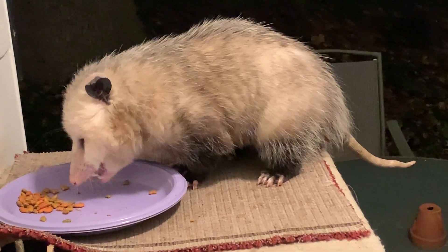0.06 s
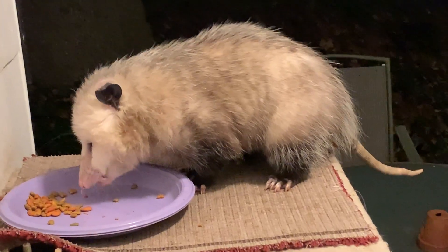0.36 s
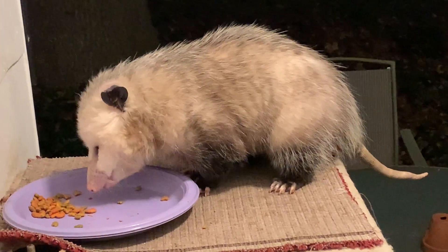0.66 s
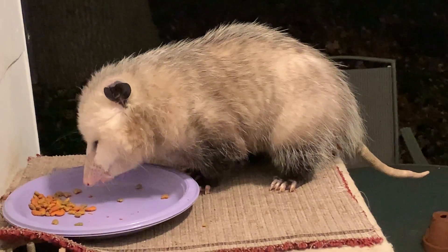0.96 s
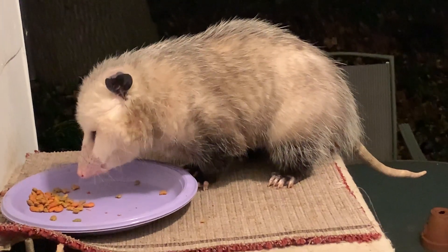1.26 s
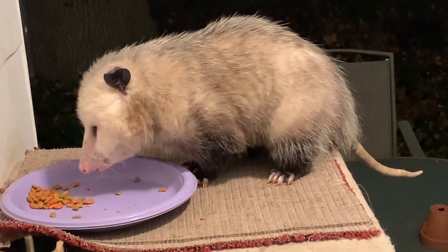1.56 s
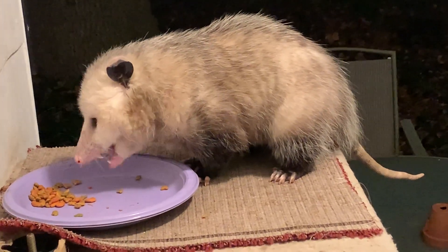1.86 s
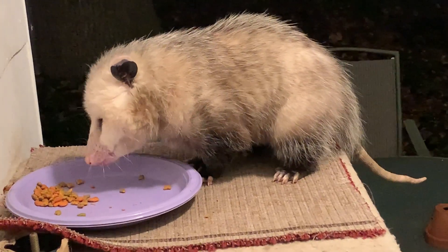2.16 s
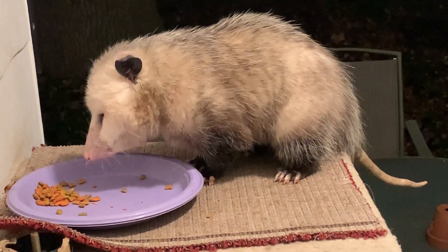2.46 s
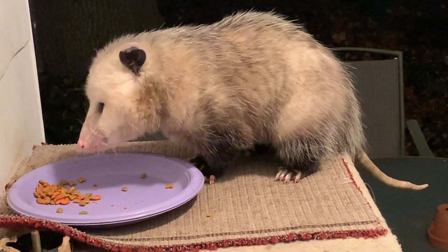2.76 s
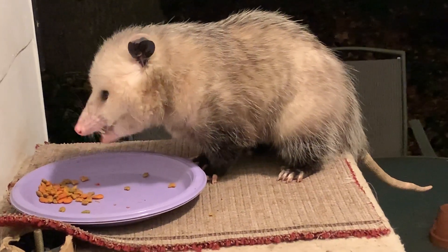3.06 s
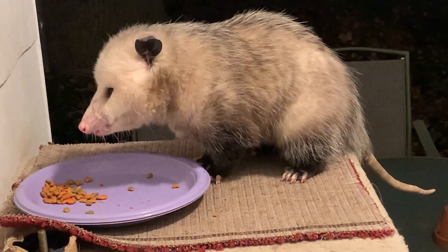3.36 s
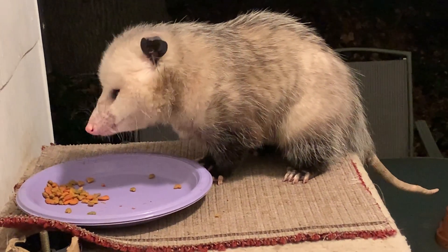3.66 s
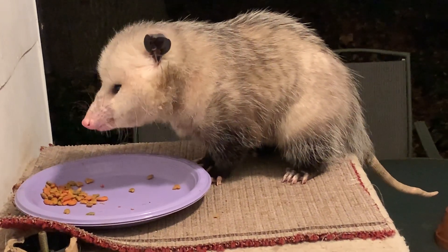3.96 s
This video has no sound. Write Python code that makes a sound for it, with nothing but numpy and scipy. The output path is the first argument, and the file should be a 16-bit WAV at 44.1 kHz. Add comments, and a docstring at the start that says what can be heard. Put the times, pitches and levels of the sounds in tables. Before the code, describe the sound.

A small animal crunches dry pet food on a porch at night, heard up close. Sharp, uneven cracks alternate with softer grinding and wet clicks throughout, over a steady low outdoor rumble and faint hiss.

```python
"""Opossum chewing kibble

An opossum chews dry kibble over a plate on a porch at night, about three bites a second.
Each piece breaks with a bright crack that rings the mouth and knocks the jaw; crumbs grind between
bites. The table and a wall close by throw the sound back, over a low outdoor rumble and faint hiss."""
import sys
import numpy as np
from scipy import signal
from scipy.fft import rfft, irfft
from scipy.io import wavfile

SR = 44100
rng = np.random.default_rng(int(sys.argv[2]) if len(sys.argv) > 2 else 0)


def unload_wav(signal):
    """Save mono or channel-first audio to the path in sys.argv[1] as 16-bit WAV at rate SR, clipped to [-1, 1]."""
    wavfile.write(
        sys.argv[1],
        SR,
        np.round(np.clip(np.atleast_2d(signal).T, -1, 1) * 32767).astype(np.int16),
    )


N = 176400

# tone of the night's rumble and hiss (f/Hz, level/dB)
RUMBLE_TONE = [(22, -71), (31, -21), (41, -5.5), (58, 0), (80, -4.5), (120, -9), (190, -16), (270, -20.5),
               (380, -32.5), (520, -51.5), (1000, -54)]
HISS_TONE = [(300, 8), (700, 9.5), (1200, 4.5), (1700, -2.5), (2700, -1), (3300, -2.5), (4000, 2.5),
             (4400, 0.5), (4750, 11), (5050, 3), (5600, 1.5), (6250, 3), (7800, -1.5), (8300, -2),
             (8700, -1.5), (9600, -6.5), (10250, -1), (10700, -13), (13000, -20), (15600, -47.5)]
# how much louder the hiss is on the left (f/Hz, level/dB)
HISS_TILT = [(200, -3.5), (1500, 3), (2700, 1), (3500, 0), (5000, -3.5), (6200, -7), (7500, -4.5),
             (8400, 3.5)]
# how alike the night sounds on both sides (f/Hz, likeness from 0 to 1)
LIKENESS = [(60, 1), (200, 0.99), (350, 0.55), (550, 0.12), (1200, 0.033), (3000, 0.1), (6000, 0.12)]
# crumbs grinding (t/s, length/s, mouth f/Hz, ring level/dB, crack level/dB)
GRINDS = [(0.097, 0.062, 1570, -68, -83), (0.384, 0.021, 1065, -64, -84), (0.44, 0.025, 1840, -56.5, -69),
          (0.554, 0.048, 1720, -56, -73), (0.63, 0.029, 1430, -51, -82), (0.696, .09, 1650, -67.5, -88),
          (0.803, 0.016, 1770, -56.5, -67), (1.135, 0.05, 1674, -75, -73),
          (1.495, 0.065, 1790, -63.5, -64.5), (1.907, 0.056, 1574, -58, -71),
          (2.309, 0.065, 1390, -73, -80), (2.402, 0.047, 1390, -58.5, -65), (2.751, 0.09, 1250, -79, -69),
          (2.908, .025, 2970, -70, -70), (3.10, 0.059, 1365, -64.5, -69), (3.41, .04, 2260, -75, -77),
          (3.482, 0.033, 1942, -59.5, -72), (3.555, 0.085, 1460, -58.5, -71),
          (3.906, 0.044, 1900, -66, -67.5), (3.969, 0.016, 3200, -60, -73)]
# kibble breaking (t/s, mouth f/Hz, ring level/dB, crack level/dB, knock level/dB)
SNAPS = [(0.1008, 1700, -42.5, -59, -68), (0.108, 1600, -44, -62, -65), (0.1269, 1570, -35, -40.5, -53.5),
         (0.1395, 1110, -41, -51, -59), (0.1893, 1110, -44.5, -73, -75), (0.2148, 1040, -26.5, -34.5, -44),
         (.5670, 1680, -35.5, -32.5, -41.5), (.5903, 1620, -29, -38.5, -40),
         (0.6359, 1380, -35.5, -40.5, -43.5), (0.6436, 1354, -39, -42, -47), (0.8115, 1820, -62, -72, -73),
         (.8622, 1500, -38.5, -57, -77), (0.9427, 1355, -23.5, -39, -37), (0.949, 1500, -56, -44, -46),
         (1.2327, 1310, -46.5, -70, -60), (1.2736, 1235, -23, -33.5, -36.5), (1.444, 1060, -49.5, -61, -57),
         (1.5, 1830, -65, -48, -76), (1.513, 1800, -47.5, -62, -76), (1.5661, 1640, -48, -38, -79),
         (1.5722, 1370, -34, -62, -63), (1.6312, 1070, -32.5, -39, -42), (1.6653, 880, -43, -62, -50),
         (1.9130, 1720, -47, -37.5, -74), (1.9295, 1593, -63, -43, -75), (1.9426, 1660, -48, -37, -64),
         (1.9728, 1510, -46, -44, -64), (2.007, 1540, -44.5, -45, -51), (2.0639, 1620, -39.5, -38.5, -48),
         (2.0930, 1408, -26, -32.5, -40), (2.0999, 1550, -34, -38, -40.5), (2.314, 1400, -60, -48, -68),
         (2.3357, 1370, -49, -47.5, -59), (2.382, 1550, -45, -36, -51.5), (2.4148, 1440, -66, -35, -56),
         (2.4725, 1090, -52, -66, -62), (2.7237, 1230, -47, -60, -59), (2.7496, 1420, -42, -54, -59),
         (2.7832, 1248, -39, -40, -46.5), (3.1340, 1160, -44.5, -69, -65), (3.1589, 1190, -43.5, -71, -59),
         (3.1912, 1080, -46, -45.5, -50), (3.2116, 1020, -47.5, -57, -73),
         (3.5485, 1390, -35.5, -33.5, -56), (3.5685, 1450, -44, -43, -54), (3.589, 1410, -63, -47, -71),
         (3.6026, 1180, -37, -34.5, -40), (3.609, 1300, -53, -60, -71)]
# the notes of jaw and skull (f/Hz, level/dB, peak t/s)
JAW_RINGS = [(379.6, -4, 0.0019), (453, -5, 0.0025), (615, -3.5, 0.0013)]
# tone of the dry cracks and of the wet clicks (f/Hz, level/dB)
CRACK_TONE = [(200, 5), (600, -7), (1900, 0), (2500, -5), (3100, -5.5), (4700, -11), (6500, -10.5),
              (8600, 2.5), (10500, -4.5), (14000, -9.5), (16000, -14)]
WET_TONE = [(300, -22.5), (700, -15), (1900, -2), (2600, -11), (3100, -2.5), (3900, 1.5), (4500, -8),
            (8000, -11.5)]
# tone of the straight path to the right microphone (f/Hz, level/dB)
RIGHT_TONE = [(300, -4.5), (550, -3), (1100, -7), (1800, -20), (3500, 6), (6000, 8), (8000, 7)]
# echoes from table and wall (delay t/s, left gain, right gain)
ECHOES = [(.0036, 0.17, .12), (.0057, 0.64, 0.38), (0.0094, 0.29, 0.14), (0.0127, 0.51, 0.33),
          (0.021, 0.1, .08), (.0272, .07, .09)]
# tone of those echoes (f/Hz, level/dB)
ECHO_TONE = [(300, -7), (1400, -1), (2500, -6), (5000, 5.5), (9000, -9), (16000, -32)]
# time the porch's echo tail takes to fade by 60 dB (f/Hz, t/s)
TAIL_FADE = [(300, .15), (1300, .105), (5000, .11), (14000, .09)]
# tone of that tail (f/Hz, level/dB)
TAIL_TONE = [(300, -11), (700, -4), (1300, -6.5), (4000, -1), (9000, -5.5), (16000, -6.5)]
# how far the left side's wave runs ahead in the bass and middle (f/Hz, phase/radians)
LEFT_LEAD = [(100, 0.2), (500, 0.23), (1100, -0.63), (2100, 0.07), (3000, 3.5), (4000, 4.5), (5300, 3),
             (6200, 1.5)]

CRACK_PEAK_S = .0004
FIRM_BITE_DB = -35.5  # how loudly a firm bite rings the mouth


def amp(db):
    """Turns decibels into a number to multiply by."""
    return 10 ** (np.asarray(db) / 20)


def unit(x):
    """Scales a sound to an average power of 1."""
    return x / np.sqrt(np.mean(x ** 2) + 1e-20)


def read(points, hz):
    """Looks up frequencies in a table, sliding smoothly between its rows."""
    f, value = np.transpose(points)
    return np.interp(np.log(hz + 1), np.log(f), value)


def add(mix, s, sound):
    """Mixes a sound in at s seconds."""
    part = mix[max(round(s * SR), 0):][:len(sound)]
    part += sound[:len(part)]


def colour(x, tone, keep_power=False):
    """Filters a sound by a tone table; keep_power leaves white noise as strong as it was."""
    log_gain = np.log(amp(read(tone, abs(np.fft.fftfreq(2048, 1 / SR)))))
    response = np.exp(np.conj(signal.hilbert(log_gain)))  # never rings ahead of a click
    taps = np.fft.ifft(response).real[:1024]
    return signal.oaconvolve(x, taps / np.linalg.norm(taps) if keep_power else taps)[:len(x)]


def swell(t, peak_s):
    """Rises to 1 at peak_s, then dies away."""
    return t / peak_s * np.exp(1 - t / peak_s)


def ring(t, hz, peak_s):
    """One note of a struck object that dies away quickly."""
    return np.sqrt(2) * swell(t, peak_s) * np.sin(2 * np.pi * hz * t)


def night():
    """Steady low rumble, alike on both sides, and a wide faint hiss."""
    hz = np.fft.rfftfreq(N, 1 / SR)
    alike = read(LIKENESS, hz)

    def noise(tone, tilt_db):
        left, other = rfft(rng.standard_normal((2, N)))
        right = alike * left + np.sqrt(1 - alike ** 2) * other
        pair = np.array([left * amp(tilt_db / 2), right * amp(-tilt_db / 2)])
        return unit(irfft(pair * amp(read(tone, hz)), N))
    rumble = amp(-45.5) * noise(RUMBLE_TONE, tilt_db=1.48)
    hiss = amp(-61) * noise(HISS_TONE, read(HISS_TILT, hz))
    return rumble + hiss


def mouth(t, hz, peak_s):
    """The hollow mouth answers a click with a main note and a faint higher one."""
    return ring(t, hz, peak_s) + amp(-25) * ring(t, hz=4064, peak_s=.00092)


def grinding(t):
    """Crumbs burst between the teeth: tiny clicks ring the mouth and crackle, both dry and wet."""
    body, cracks, wet = np.zeros((3, N))
    crumbs_per_s, spread_db = 700, 5
    for s, length, hz, ring_db, crack_db in GRINDS:
        n = int(length * SR)
        chance = rng.random(SR // 4)[:n]
        size, grit = rng.standard_normal((2, SR // 4))[:, :n]
        crumbs = (chance < crumbs_per_s / SR) * amp(spread_db * size) * np.sqrt(np.hanning(n))
        rings = signal.fftconvolve(crumbs * np.sign(grit), mouth(t, hz, peak_s=.00042))[:n]
        crackle = unit(signal.fftconvolve(crumbs, swell(t, CRACK_PEAK_S / 2))[:n] * grit)
        add(body, s, amp(ring_db) * unit(rings))
        add(cracks, s, amp(crack_db) * crackle)
        add(wet, s, amp(ring_db - 7) * crackle)
    return np.array([body, cracks, wet])


def crack(t, crack_db, knock_db):
    """A piece strains, then breaks with a burst of noise, pings at its own pitch and crumbles."""
    burst, grit, strain = rng.standard_normal((3, len(t)))
    before = amp(crack_db - 15) * (strain * np.exp(-t / .002))[::-1]  # reversed, so it builds up
    shape = swell(t, CRACK_PEAK_S)
    burst = unit(burst * shape) * np.sqrt(np.mean(shape ** 2))
    ping_hz = min(9220 * np.exp(.288 * rng.standard_normal()), 15850)
    ping = amp(-15.5) * ring(t, ping_hz, peak_s=.0012)
    crumble = amp((crack_db + knock_db) / 2 - 12) * np.exp(-t / .004) * grit * abs(grit)
    return np.concatenate([before, amp(crack_db) * (burst + ping) + crumble])


def bites(t):
    """Each snap of kibble rings the mouth and knocks the jaw, with a wet click of the tongue."""
    body, cracks, wet = np.zeros((3, N))
    knock = sum(amp(db) * ring(t, hz, peak_s) for hz, db, peak_s in JAW_RINGS)
    for s, hz, ring_db, crack_db, knock_db in SNAPS:
        force_db = ring_db - FIRM_BITE_DB
        peak_s = .0007 * 2 ** (force_db / 40)  # a firm bite shuts the mouth, which then rings longer
        add(body, s, amp(ring_db) * mouth(t, hz, peak_s) + amp(knock_db) * knock)
        add(cracks, s - len(t) / SR, crack(t, crack_db, knock_db))  # the break lands at s
        tongue = swell(t, peak_s=.0013) * rng.standard_normal(len(t))
        add(wet, s, amp(-50.5 + .65 * force_db) * tongue)
    return np.array([body, cracks, wet])


def chewing():
    """Bites and grinding together, with the dry and wet noises each given their own tone."""
    t = np.arange(SR // 30) / SR
    body, cracks, wet = bites(t) + grinding(t)
    return body + colour(cracks, CRACK_TONE, keep_power=True) + colour(wet, WET_TONE, keep_power=True)


def porch(x):
    """Sound arrives straight, then as near echoes that lose their highest treble, then as a tail."""
    out = np.array([x, colour(x, RIGHT_TONE)])
    echo = colour(x, ECHO_TONE)
    for delay, left, right in ECHOES:
        add(out[0], delay, left * echo)
        add(out[1], delay, right * echo)
    hz, t, noise = signal.stft(rng.standard_normal((3, 2, SR // 3)), SR, nperseg=128)

    def fade(fade_s):
        rate = np.log(1000) / fade_s  # down 60 dB after fade_s
        return np.exp(-rate * t) * np.sqrt(2 * rate / SR)
    early = fade(read(TAIL_FADE, hz)[:, None])
    late = amp(-17) * fade(.5)
    tone = amp(read(TAIL_TONE, hz))[:, None]
    tails = signal.istft(noise * tone * (early + late), SR, nperseg=128)[1]
    tails *= np.minimum(np.arange(tails.shape[-1]) / SR / .0045, 1)  # quick fade-in
    for k, tail in enumerate(tails):  # the moving head sends sound along changing paths
        share = np.sqrt(2 / 3) * np.cos(np.pi * (np.arange(N) / SR + k / 3))
        out += signal.oaconvolve((x * share)[None], tail, axes=1)[:, :N]
    return out


def table_bumps():
    """Each bite jolts the table into a soft low bump, the same on both sides."""
    out = np.zeros(N)
    bump = ring(np.arange(SR // 8) / SR, hz=67.5, peak_s=.014)
    for s, _, ring_db, _, _ in SNAPS:
        add(out, s + .0026, amp(ring_db - 19) * bump)
    return out


def scene():
    """The chewing animal on the porch, in the night air."""
    return porch(chewing()) + table_bumps() + night()


def record(dry):
    """The treble is nearly the same on both sides, the right slightly earlier; the very top is cut off."""
    crossover_hz, in_step_hz, right_early_s, top_hz = 6800, 6200, .000208, 15850
    hz = np.fft.rfftfreq(N, 1 / SR)
    left, right = rfft(dry)
    shared = .99 * np.clip((hz - crossover_hz) / 2000 + .5, 0, 1)
    right = shared * left + np.sqrt(1 - shared ** 2) * right * (1 - shared / 2)
    treble_phase = 2 * np.pi * right_early_s * (hz - in_step_hz)
    right *= np.exp(1j * np.where(hz > in_step_hz, treble_phase, -read(LEFT_LEAD, hz)))
    pair = irfft(np.array([left, right]), N)
    top_cut = signal.firwin(511, top_hz, window=("kaiser", 9), fs=SR)
    return signal.oaconvolve(pair, top_cut[None], "same")


dry = scene()
out = record(dry)
unload_wav(out)
```